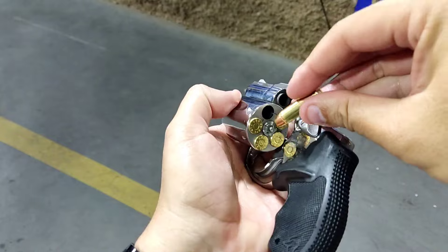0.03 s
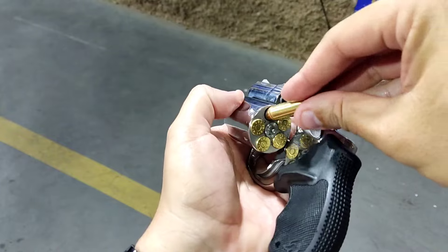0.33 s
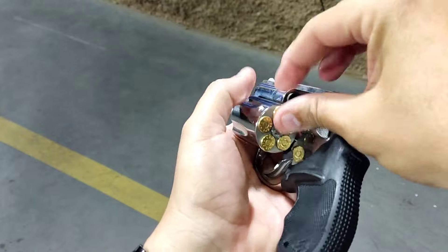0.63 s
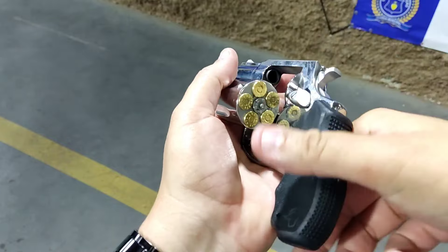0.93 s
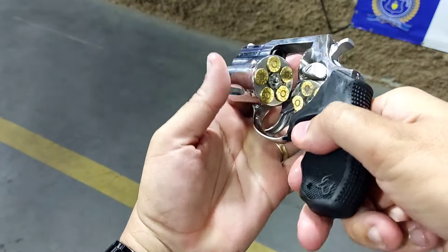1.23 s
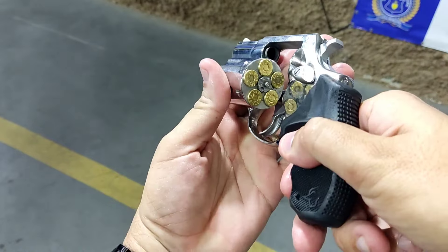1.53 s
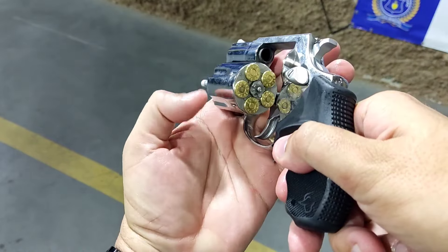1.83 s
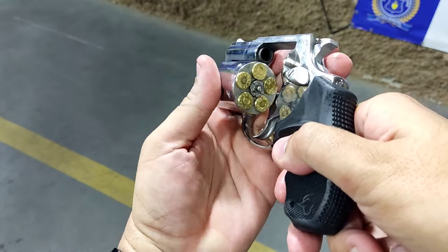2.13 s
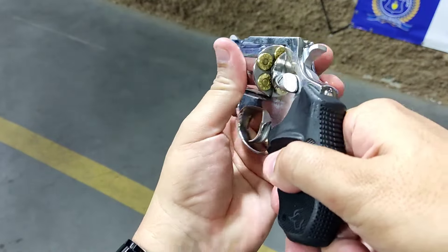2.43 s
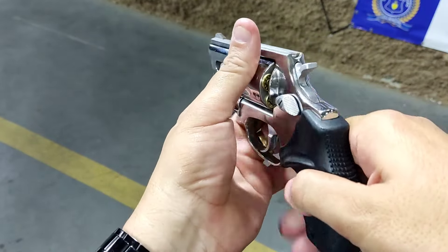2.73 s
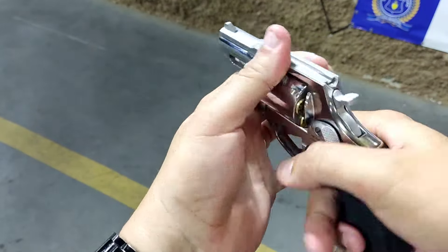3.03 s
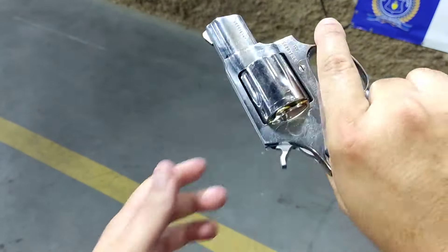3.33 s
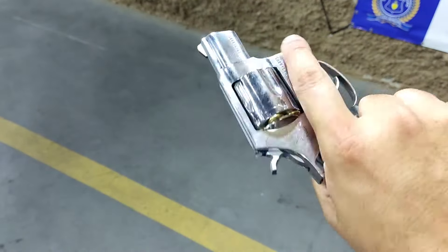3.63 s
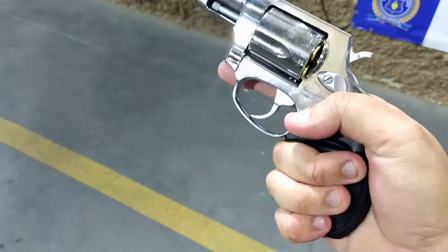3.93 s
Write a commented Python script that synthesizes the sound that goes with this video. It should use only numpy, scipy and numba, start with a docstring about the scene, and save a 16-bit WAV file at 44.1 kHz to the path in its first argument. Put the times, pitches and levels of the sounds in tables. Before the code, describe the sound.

A revolver is loaded and closed with sharp, close metal clicks. A cartridge taps the chamber at 0.2 seconds, then slides in and seats around 0.7. The cylinder ticks faintly near 1.2 and 1.7 seconds, swings shut with a loud clatter at 2.35 and locks with a snap at 2.6. Smaller clicks follow around 2.8 and 3.15. Ventilation rushes and hums softly throughout in a hard room.

```python
"""Sharp metal clicks, close by: the last cartridge slides into a revolver, then the cylinder is turned,
swung shut and locks. Each contact is a short crack that rings the steel, the hand-damped frame and the
brass cases; a slide is a swell of tiny catches that ring the same parts. Behind it, ventilation rushes
and hums in a hard room. A limiter turns everything down for a moment after the loudest snaps."""
import sys
import numpy as np
from scipy import signal
from scipy.fft import rfft, irfft
from scipy.io import wavfile
from scipy.ndimage import uniform_filter1d
from numba import njit

SR = 44100
rng = np.random.default_rng(int(sys.argv[2]) if len(sys.argv) > 2 else 0)


def wav_out(sig):
    """Save sig, one row per channel (or a flat mono array), as 16-bit PCM at SR to the path in sys.argv[1]."""
    wavfile.write(sys.argv[1], SR, np.round(np.clip(np.atleast_2d(sig).T, -1, 1) * 32767).astype(np.int16))


N = 176400
T = np.arange(N) / SR

# The cartridge touches the chamber, bounces and seats. Each row: start in seconds, strength in dB,
# knock level in dB, knock pitch in Hz, brass ring in dB.
CARTRIDGE_HITS = [ (.1820, -11, -3, 4200, -4), (0.191, -21.5, 6.5, 3760, -17),
                  (0.1938, -30.5, 16, 3280, -10), (0.252, -35.5, 14, 3700, 8),
                  (0.4343, -33.5, 8.5, 3600, -8), (.641, -24.5, 10, 3460, -3),
                  (0.7149, -13.5, -12, 4600, 5), (.7160, -3, -4.5, 1720, -1), (0.718, -12.5, 0, 4800, -3),
                  (0.732, -21.5, 4, 3870, -8), (.7740, -38, 15.5, 1660, 0)]
# The cylinder, its swing arm and the latch click and rattle. Each row: start in seconds, strength in dB,
# knock level in dB, knock pitch in Hz, left minus right in dB.
ACTION_CLICKS = [ (1.177, -32.5, -16, 2000, -5), (1.207, -34, -20, 2000, -8.5),
                 (1.7176, -23, 17, 1950, 2.5), (1.801, -49.5, 27.5, 1920, -2), (2.3411, 4.5, -1.5, 2250, 4),
                 (2.3426, 5.5, 3, 2170, -2), (2.3463, -6.5, 5.5, 1900, -13), (2.3695, 4, -2.5, 2200, -2),
                 (2.3720, 6, -1, 1905, -1), (2.3837, -9, 8, 1990, -4), (2.386, -24, 11, 1950, 3),
                 (2.4005, -27, 9, 2120, -4), (2.4660, -30.5, -12, 2000, 5), (2.5890, -5, -11, 2000, 2.5),
                 (2.5923, 6, -11, 2210, 7), (2.593, 7, -8, 1770, 3), (2.596, 8, -2, 2310, 1),
                 (2.6100, -13, 3, 1800, 10), (2.683, -21, -11, 3700, 6), (2.8374, 0, -33, 2000, -7.5),
                 (2.99, -30.5, -4, 2000, 1), (3.146, -11.5, 1, 4140, -2.5), (3.155, -26, 5.5, 2300, -3),
                 (3.862, -28, -11, 2010, -3)]
# Metal slides on metal. Each row: start and length in seconds, then strength, knock and brass ring in dB.
METAL_SLIDES = [(0.628, 0.057, -29.5, -10, 0), (0.74, 0.034, -28, -14, -5), (1.783, 0.037, -49, 27, -16),
                (2.316, 0.065, -34, 11, -9), (2.576, 0.021, -30, 18.5, -16),
                (2.679, 0.052, -21.5, -20, -12), (2.872, 0.015, -24.5, -15, -17),
                (3.226, 0.014, -32.5, 0, -22)]
# The tone of a contact's crack. Each row: frequency in Hz, relative level in dB.
CRACK_COLOUR = [(300, -48), (1000, -21), (2700, -2), (4300, 6), (6200, -1.5), (8500, 8.5), (11000, 5),
                (13500, 1.5), (16000, -43)]
# The notes of the steel cylinder and arm. Each row: pitch in Hz, level in dB, seconds to fade by 60 dB.
STEEL_MODES = [(3880, -23, 0.034), (5000, -11.5, 0.0055), (5920, 4, 0.0027), (6460, 1, 0.002),
               (7170, -9.5, 0.015), (7830, -27, 0.036), (8460, -6.5, 0.0073), (8470, 10.5, 0.0021),
               (9700, 1, 0.0014)]
# The notes of the brass cases. Each row: pitch in Hz, level in dB, seconds to fade by 60 dB.
BRASS_MODES = [(12610, -3, 0.047), (12800, -2, 0.021)]
# The notes of a knock on the hand-damped gun. Each row: multiple of the knock pitch, level in dB,
# seconds to fade by 60 dB.
KNOCK_MODES = [(0.571, -18, 0.02), (1, -7, 0.018), (1.1, -18, 0.013), (1.44, -11.5, 0.0058),
               (1.8, -16.5, 0.012)]
# The tone of the room's echo. Each row: frequency in Hz, relative level in dB.
ECHO_COLOUR = [(300, 25), (2000, 12.5), (5000, 8.5), (8500, 6), (15000, 4)]
# The tone of the rushing air. Each row: frequency in Hz, relative level in dB.
AIR_COLOUR = [(12, -26), (20, -1), (33, -2.5), (64, -15.5), (134, -13), (227, -14.5), (344, -18.5),
              (466, -24), (686, -22), (809, -24), (1010, -29), (5910, -38.5), (8460, -38), (9710, -38.5),
              (13500, -40), (14700, -70)]
# How alike the air sounds left and right. Each row: frequency in Hz, likeness (0 unrelated, 1 the same).
AIR_LIKENESS = [(30, 0.88), (120, 0.69), (300, 0.68), (600, 0.022), (1500, 0.05), (4000, 0.035),
                (12000, 0.37)]
# Motor and duct tones. Each row: pitch in Hz, level in dB, speed of wavering in Hz, unsteady share (0-1).
HUM_TONES = [(59.76, -39.5, 10.5, 0.46), (119.4, -34, 17.3, 0.36), (173, -44, 11.3, 0.97),
             (620, -63, 8.8, 0.5), (678.6, -53.5, 2, 0.4), (813, -56, 26, 0.62), (903, -62, 11, 0.52)]

CRACK_DB, CRACK_DECAY_S, ATTACK_S = -5.5, 0.0012, 0.0004
CHATTER_DB, CHATTER_DECAY_S = -7.5, 0.0031  # loose parts buzz on after the crack
PITCH_SCATTER, LEVEL_SCATTER_DB, PATH_SCATTER_S = 0.008, 1.5, 0.00004
FRAME_HZ, SLIDE_GRAIN = 1920, 0.25  # a slide's knock pitch, and how uneven its catches are
ECHO_DB, ECHO_FADE_S, ECHO_DELAY_S = -18.5, 0.19, 0.015
PORT_HZ, PORT_WIDTH_HZ, PORT_DB = 8800, 2160, 8.5
LIMIT_DB, LIMIT_ATTACK_S, LIMIT_RELEASE_S = -2.5, 0.000067, 0.11
TREBLE_CUT_HZ = 15600


def revolver():
    """The cartridge's hits, the clicks of the moving parts and the slides, each at its own time."""
    out = np.zeros((2, N))
    for at, db, knock_db, knock_hz, brass_db in CARTRIDGE_HITS:
        add(out, at, strike(knock_db, knock_hz, brass_db) * undb(db) * pan(-1))
    for at, db, knock_db, knock_hz, pan_db in ACTION_CLICKS:
        click = strike(knock_db, knock_hz, brass_db=-15)  # the loaded cases ring along faintly
        add(out, at, click * undb(db) * pan(pan_db))
    for at, length, db, knock_db, brass_db in METAL_SLIDES:
        add(out, at, slide(length, knock_db, brass_db) * undb(db) * pan(-4))
    return out


def strike(knock_db, knock_hz, brass_db):
    """One contact cracks, chatters, knocks at the pitch of the part it meets and rings steel and brass."""
    t = T[:SR // 10]
    snap = undb(CRACK_DB) * np.exp(-t / CRACK_DECAY_S)
    chatter = undb(CHATTER_DB) * np.exp(-t / CHATTER_DECAY_S)
    crack = noise(CRACK_COLOUR, len(t)) * (snap + chatter)
    knock = ring([(multiple * knock_hz, db, fade_s) for multiple, db, fade_s in KNOCK_MODES], t)
    hit = crack + ring(STEEL_MODES, t) + undb(knock_db) * knock + undb(brass_db) * ring(BRASS_MODES, t)
    return hit * np.minimum(t / ATTACK_S, 1)


def ring(modes, t):
    """Struck metal rings with fading notes (modes), a little different each time and on each side."""
    out = 0
    for hz, db, fade_s in modes:
        pitch = hz * (1 + PITCH_SCATTER * rng.standard_normal())
        path_s = PATH_SCATTER_S * rng.standard_normal((2, 1))  # its own path to each microphone
        gain = undb(db + LEVEL_SCATTER_DB * rng.standard_normal((2, 1)))
        out = out + gain * np.sin(2 * np.pi * pitch * (t + path_s)) * fade(t, fade_s)
    return out


def slide(length, knock_db, brass_db):
    """Sliding metal catches many times, and each catch is a tiny strike."""
    t = T[:SR // 10]
    swell = np.sin(np.pi * np.minimum(t / length, 1))
    catches = rng.standard_normal(len(t)) * np.exp(SLIDE_GRAIN * rng.standard_normal(len(t))) * swell
    catches /= np.linalg.norm(catches)
    return signal.fftconvolve(strike(knock_db, FRAME_HZ, brass_db), catches[None], axes=1)


def room_echo(sound):
    """Floor and walls send back a faint, blurred echo."""
    t = T[:SR]
    tail = noise(ECHO_COLOUR, len(t)) * fade(t, ECHO_FADE_S) * (t > ECHO_DELAY_S)
    tail /= np.sqrt(np.sum(tail ** 2, axis=1, keepdims=True))
    return undb(ECHO_DB) * signal.fftconvolve(sound, tail, axes=1)[:, :N]


def air_rush():
    """Air rushes through the ventilation, much alike on both sides in the bass."""
    first, second = rfft(noise(AIR_COLOUR, N))
    alike = on_bins(AIR_LIKENESS, N)
    shared = irfft(first * np.sqrt((1 + alike) / 2), N)
    opposed = irfft(second * np.sqrt((1 - alike) / 2), N)
    return np.array([shared + opposed, shared - opposed])


def vent_hum():
    """The ventilation's motor and ducts hum with wavering tones."""
    hum = 0
    for hz, db, waver_hz, unsteady in HUM_TONES:
        waver = np.sqrt(1 - unsteady ** 2) + unsteady * drift(waver_hz)
        tone = np.exp(2j * np.pi * (hz * T + rng.random()))
        hum = hum + np.sqrt(2) * undb(db) * (waver * tone).real
    return hum


def drift(hz):
    """A slow random wander in a tone's strength and phase; more Hz makes it quicker."""
    white = rng.standard_normal(N) + 1j * rng.standard_normal(N)
    keep_slow = np.exp(-(np.fft.fftfreq(N, 1 / SR) / hz) ** 2)
    wander = np.fft.ifft(np.fft.fft(white) * keep_slow)
    return wander / wander.std()


def noise(colour, size):
    """Two unrelated noises, left and right, with the tone that a table gives."""
    shaped = irfft(rfft(rng.standard_normal((2, size))) * undb(on_bins(colour, size)), size)
    return shaped / shaped.std()


def on_bins(points, size):
    """Fill in a table's value at every frequency of a spectrum."""
    hz, value = np.array(points).T
    return np.interp(np.log(np.fft.rfftfreq(size, 1 / SR) + 1e-9), np.log(hz), value)


def fade(t, seconds):
    """A fade that falls by 60 dB in the given time."""
    return np.exp(-np.log(1000) * t / seconds)


def undb(db):
    """Turn decibels into a gain."""
    return 10 ** (np.asarray(db) / 20)


def pan(db):
    """Left and right gains, with the left louder by this many dB."""
    return undb(np.array([[db], [-db]]) / 2)


def add(out, at, sound):
    """Mix a sound in at a time in seconds."""
    start = int(at * SR)
    out[:, start:start + sound.shape[1]] += sound[:, :N - start]


def microphone_port(sound):
    """The right microphone's opening rings a little in the treble."""
    left, right = sound
    ringing = signal.lfilter(*signal.iirpeak(PORT_HZ, PORT_HZ / PORT_WIDTH_HZ, fs=SR), right)
    return np.array([left, right + (undb(PORT_DB) - 1) * ringing])


@njit
def limiter(over_db, attack, release):
    """How many dB to turn down: jumps up when the sound is too loud, then sinks slowly."""
    out, duck_db = np.empty(len(over_db)), 0.
    for i in range(len(over_db)):
        duck_db += (over_db[i] - duck_db) * (attack if over_db[i] > duck_db else release)
        out[i] = duck_db
    return out


def scene():
    """The revolver in the humming room, at the two microphones."""
    gun = revolver()
    return microphone_port(gun + room_echo(gun) + air_rush() * undb(-35.5) + vent_hum() * pan(-6))


def record(dry):
    """A fast limiter ducks both sides, peaks that slip through clip, and the highest treble is cut."""
    peak_db = 20 * np.log10(np.abs(dry).max(axis=0) + 1e-9)
    attack, release = 1 - np.exp(-1 / (LIMIT_ATTACK_S * SR)), 1 / (LIMIT_RELEASE_S * SR)
    duck_db = limiter(np.maximum(peak_db - LIMIT_DB, 0), attack, release)
    duck_db = uniform_filter1d(duck_db, size=32)  # the limiter looks ahead and eases in
    clipped = np.clip(dry * undb(-duck_db), -1, 1)
    return signal.sosfilt(signal.ellip(8, .2, 70, TREBLE_CUT_HZ, fs=SR, output="sos"), clipped)


dry = scene()
out = record(dry)
wav_out(out)
```